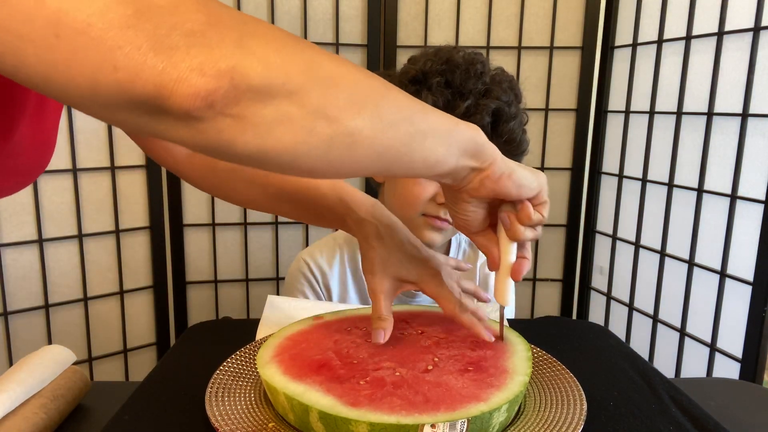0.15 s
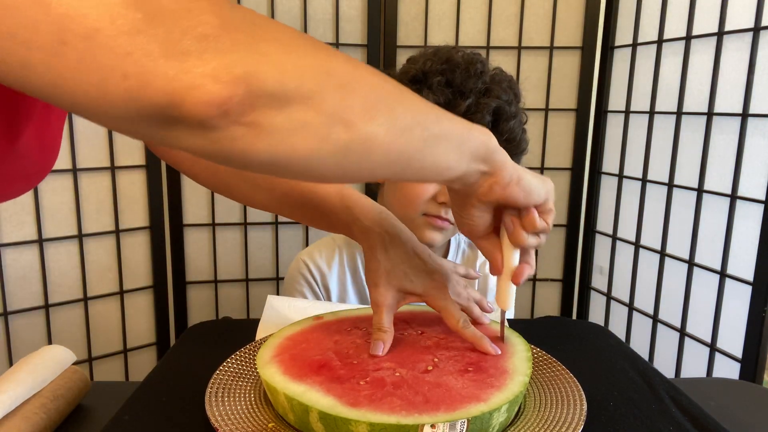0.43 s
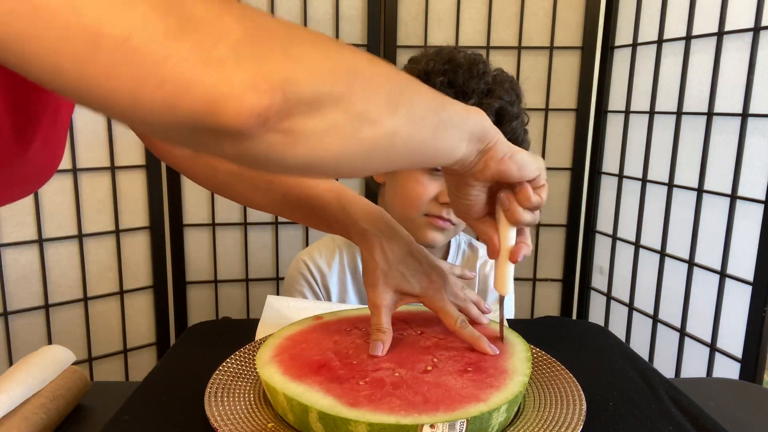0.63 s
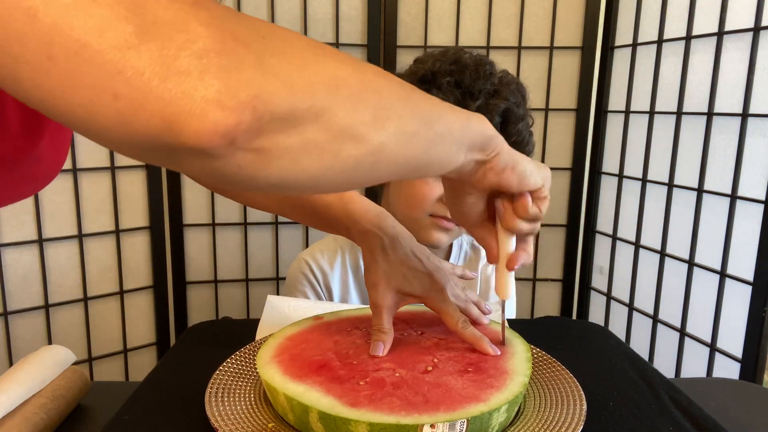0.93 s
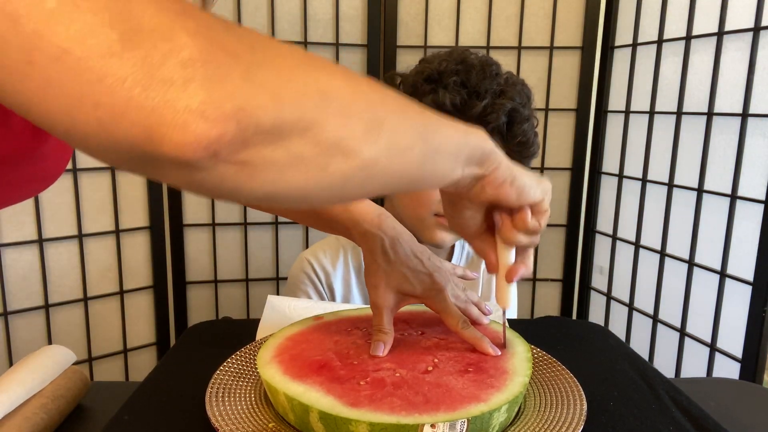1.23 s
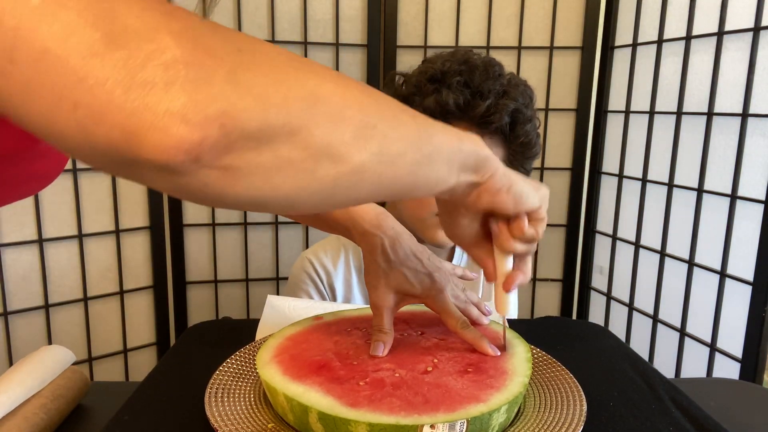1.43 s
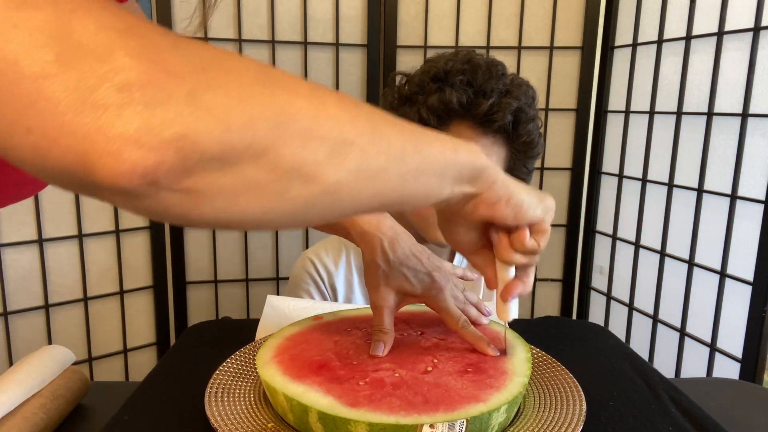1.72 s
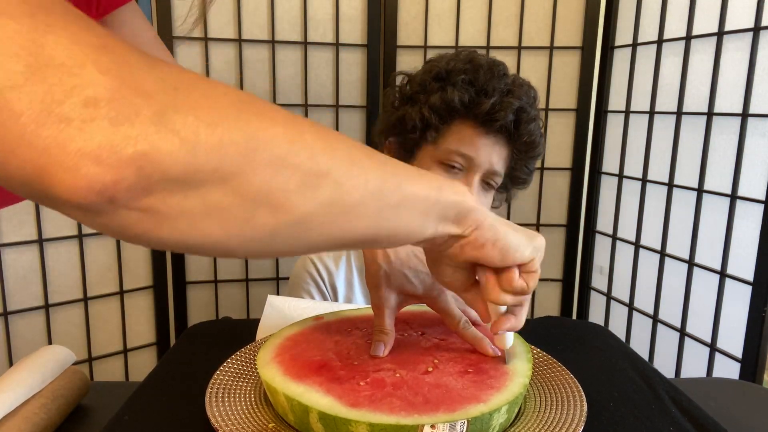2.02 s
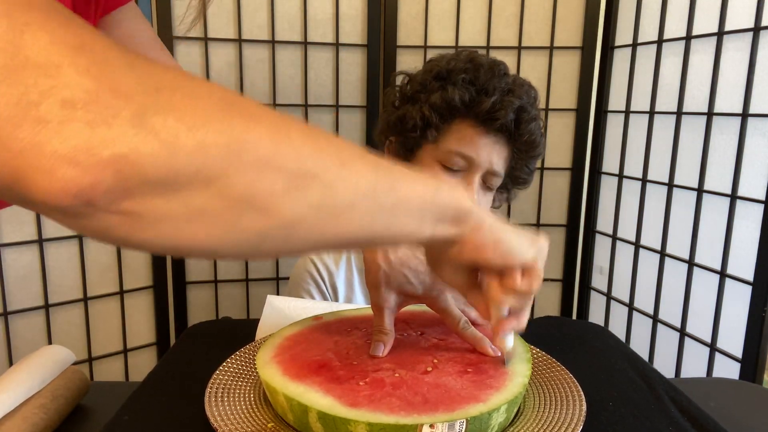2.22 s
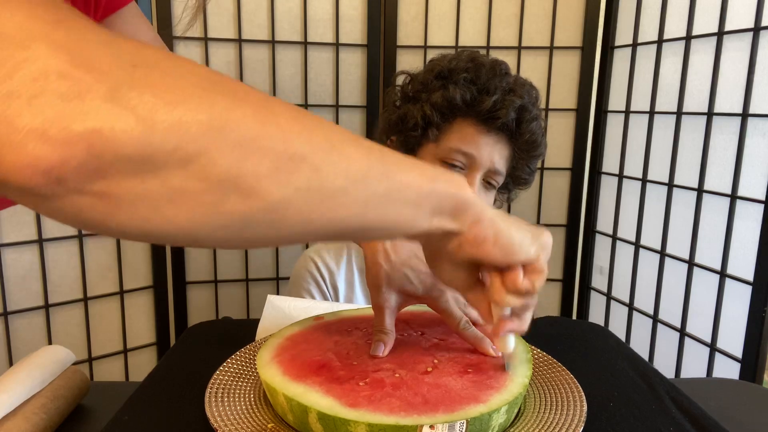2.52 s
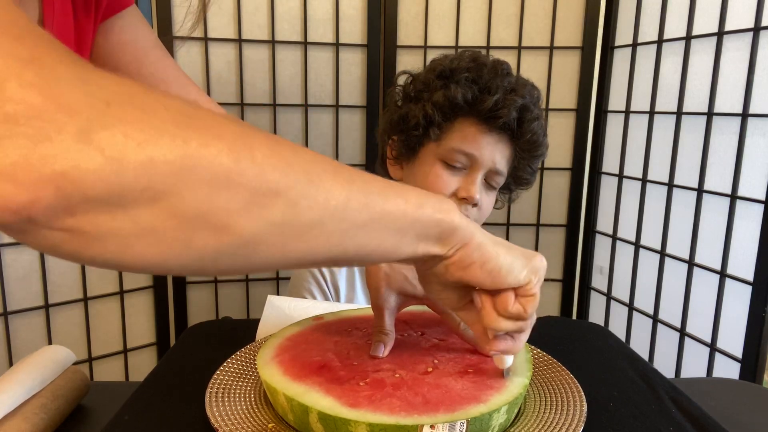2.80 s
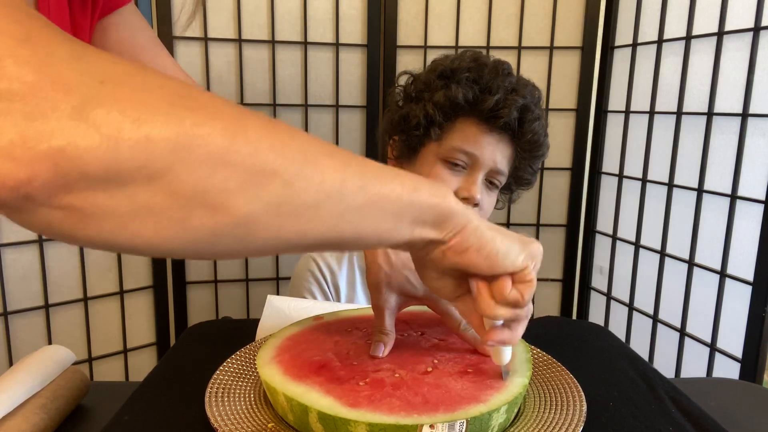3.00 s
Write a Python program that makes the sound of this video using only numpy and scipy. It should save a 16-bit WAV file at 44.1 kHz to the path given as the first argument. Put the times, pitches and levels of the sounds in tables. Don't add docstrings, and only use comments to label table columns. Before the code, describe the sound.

Short swelling crunches of a blade in watermelon flesh end in dry knocks and soft table thuds, growing quicker; close microphone on a shaky stand in a small room with faint hum and hiss.

```python
import sys
import numpy as np
from scipy import signal
from scipy.fft import rfft, irfft, next_fast_len
from scipy.io import wavfile
from scipy.ndimage import uniform_filter1d, map_coordinates

SR = 44100
rng = np.random.default_rng(int(sys.argv[2]) if len(sys.argv) > 2 else 0)


def output_pcm(signal):
    pcm = np.clip(np.atleast_2d(signal).T, -1, 1) * 32767
    wavfile.write(sys.argv[1], SR, np.round(pcm).astype(np.int16))


def convert_level_to_amplitude(level_db):
    exponent = np.asarray(level_db, float) / 20
    return 10 ** exponent


N = 138915

# (knock t/s, knock level/dB, crunch level/dB, crunch length/s, hollow slab tone level/dB)
STROKES = [(0.6661, -23, -48, 0.1, -7.5), (0.9816, -29, -43.5, 0.076, -7), (1.2369, -18, -40, 0.065, -9),
           (1.4926, -24.5, -43, 0.074, -1), (1.7386, -24.5, -40, 0.082, -3), (1.9637, -29.5, -41, 0.078, 5),
           (2.1831, -25.5, -41.5, 0.051, 1), (2.3714, -26, -42.5, 0.039, -0.5),
           (2.7441, -12, -44, 0.037, -5.5), (2.9506, -22.5, -46.5, 0.049, -2),
           (3.1313, -16, -47.5, 0.038, -4)]
# (blade level/dB, rind level/dB, crack level/dB)
GRIP = [(-13.5, -0.5, -18), (-6, -1, -17), (-6, -2.5, -19.5), (-6, 1, -20), (-3, -3, -13), (4.5, -2, -15),
        (-2.5, -3, -24), (-2, -4, -30), (-4, -5.5, -26.5), (-2, -6.5, -19.5), (-3.5, 0, -29)]
# (f/Hz, level/dB, time to fall 60 dB/s)
BLADE = [(2607, 3.5, 0.013)]


def unit(x):
    return x / np.sqrt(np.mean(x ** 2) + 1e-20)


def along(points, hz):
    f, value = np.transpose(points)
    return np.interp(np.log(hz + 1), np.log(f + 1), value)


def coloured(x, gain):
    m = next_fast_len(N + 8192)
    spectrum = rfft(x, m) * gain(np.fft.rfftfreq(m, 1 / SR))
    return unit(irfft(spectrum, m)[:N])


def wobble(rate):
    points = rng.standard_normal(int(N * rate / SR) + 4)
    return map_coordinates(points, [np.arange(N) * rate / SR])


def add(track, s, sound):
    part = track[round(s * SR):][:len(sound)]
    part += sound[:len(part)]


def ring(modes, attack_s):
    scatter_db, detune = 0.8, 0.015
    t = np.arange(SR // 8) / SR
    draw = rng.standard_normal((len(modes), 2))
    total = np.zeros(len(t))
    for k, ((hz, db, t60), (a, b)) in enumerate(zip(modes, draw)):
        decay = convert_level_to_amplitude(db + scatter_db * a - 60 * t / t60)
        tone = np.sin(2 * np.pi * hz * (1 + detune * b) * t)
        total += (-1) ** k * decay * tone
    return total * (1 - np.exp(-t / attack_s))


def crunch():
    # (f/Hz, level/dB per Hz)
    crunch_colour = [(250, -29), (500, -10), (1900, -14), (3500, -12.5), (7100, -13.5), (11000, -20.5),
                     (15500, -22), (17000, -64)]
    # (end t/s, level/dB, length/s)
    rubs = [
        (0.207, -75, .07),
        (0.442, -72.5, 0.045),
        (.47, -72, 0.023),
        (0.617, -68.5, 0.045),
        (0.892, -73, 0.044),
        (1.163, -73, 0.058),
        (2.604, -56, 0.078),
        (2.665, -68, 0.049),
    ]
    grains_per_s, grain_spread_db, clump_db = 10000, 2, 1.8
    blade_width_hz, blade_in_crunch_db = 930, -7.5
    rise_power, ease = 2.6, 0.13
    drag_from_s, drag_db = 0.69, -71
    t = np.arange(N) / SR

    happens = rng.random(N) < grains_per_s / SR
    bursts = happens * rng.standard_normal(N) * convert_level_to_amplitude(grain_spread_db * rng.exponential(size=N))
    grains = coloured(bursts * convert_level_to_amplitude(clump_db * wobble(110)), lambda hz: convert_level_to_amplitude(along(crunch_colour, hz)))
    grip_db = np.interp(t, [row[0] for row in STROKES], [row[0] for row in GRIP])
    blade = coloured(grains, lambda hz: np.exp(-((hz - BLADE[0][0]) / blade_width_hz) ** 2))
    grains = grains + convert_level_to_amplitude(blade_in_crunch_db + grip_db) * blade

    speed = np.zeros(N)
    for s, _, db, length, _ in STROKES:
        u = np.clip(1 + (t - s) / length, 0, 1)
        swell = u ** rise_power * (1 - ease * u ** 5)
        dying = convert_level_to_amplitude(-60 * np.clip(t - s, 0, 1) / 0.05)
        speed += convert_level_to_amplitude(db) * swell * dying
    rub = np.zeros(N)
    for s, db, length in rubs:
        rub += convert_level_to_amplitude(db) * np.sin(np.pi * np.clip(1 + (t - s) / length, 0, 1))
    drag = convert_level_to_amplitude(drag_db + 2.9 * wobble(14)) * (t > drag_from_s)
    return room(grains * (speed + np.abs(rub) + drag), -6)[:N]


def knocks():
    # (f/Hz, level/dB, time to fall 60 dB/s)
    plate = [(1757.2, 0.5, 0.006), (3224, -3.5, 0.0051), (4110, 0, 0.0023), (5400, 2, 0.0013),
             (7140, -12, 0.0031), (9700, 0, 0.00074), (12900, -26, 0.0023)]
    slab = [(581.5, -10.5, 0.014), (726, 2, 0.021), (964, -0.5, 0.023)]
    rind = [(1302, 4, 0.0069), (1435, -1.5, 0.021)]
    out, t = np.zeros(N), np.arange(SR // 50) / SR
    for (s, db, _, _, slab_db), (blade_db, rind_db, crack_db) in zip(STROKES, GRIP):
        parts = [(plate, 0), (BLADE, blade_db), (slab, slab_db), (rind, rind_db)]
        modes = sorted((hz, level + more, t60) for part, more in parts for hz, level, t60 in part)
        add(out, s, room(convert_level_to_amplitude(db - 1.5) * ring(modes, 0.00015), -5))
        snap = uniform_filter1d(rng.choice([-1., 1.], len(t)), size=3)
        add(out, s, convert_level_to_amplitude(db + 19.5 + crack_db - 60 * t / 0.0045) * snap)
    return out


def ticks():
    # (t/s, peak level/dB)
    cells = [
        (0.0952, -57),
        (0.16, -50),
        (0.183, -49),
        (0.1964, -49),
        (0.4125, -50),
        (0.4584, -50),
        (0.564, -47),
        (0.5798, -39.5),
    ]
    centre_hz, width_hz = 11200, 7900
    out, t = np.zeros(N), np.arange(SR // 50) / SR
    bright = coloured(rng.standard_normal(N), lambda hz: np.exp(-((hz - centre_hz) / width_hz) ** 2))
    for s, db in cells:
        add(out, s, convert_level_to_amplitude(db - 12 - 60 * t / 0.023))
    return out * bright


def thuds():
    # (t/s, peak level/dB)
    pushes = [(0.664, -43), (0.982, -47.5), (1.206, -45), (1.235, -41.5), (1.352, -47), (1.495, -39.5),
              (1.622, -46), (1.737, -38.5), (1.862, -53), (1.964, -38.5), (2.089, -56.5), (2.186, -40.5),
              (2.35, -45.5), (2.37, -42), (2.52, -53), (2.747, -38), (2.859, -59), (2.954, -47.5),
              (3.13, -57)]
    # (f/Hz, level/dB, time to fall 60 dB/s)
    table_top = [(254.4, 4.5, 0.055), (173, -4.5, 0.12), (299, 2.5, 0.029), (114, -16, 0.039),
                 (434, -18, 0.0099)]
    out = np.zeros(N)
    for s, db in pushes:
        add(out, s - 0.004, convert_level_to_amplitude(db + 9) * ring(sorted(table_top), 0.0035))
    return out


def room(sound, wet_db):
    # (f/Hz, time to fall 60 dB/s)
    ring_time = [(200, 0.9), (700, 0.36), (1500, 0.48), (2600, 0.31), (5000, 0.34), (12000, 0.32)]
    # (delay/s, level/dB)
    walls = [(.0017, -9), (.004, -9), (.0095, -9.5), (0.0121, -7.5), (0.015, -8.5), (.021, -14),
             (.028, -25.5)]
    wall_smear = np.hanning(12) / 5.5
    rise_s = 0.012
    hz, t, z = signal.stft(rng.standard_normal(SR // 2), SR, nperseg=256)
    dying = convert_level_to_amplitude(-60 * t / along(ring_time, hz)[:, None])
    tail = signal.istft(z * dying, SR, nperseg=256)[1]
    tail *= 1 - np.exp(-(np.arange(len(tail)) / SR / rise_s) ** 2)
    answer = convert_level_to_amplitude(wet_db) * tail / np.linalg.norm(tail)
    answer[0] += 1
    for k, (delay, db) in enumerate(walls):
        add(answer, delay, convert_level_to_amplitude(db) * (-1) ** k * wall_smear)
    return signal.fftconvolve(sound, answer)


def stand():
    # (t/s, f/Hz, level/dB)
    shake = [(0.0, 20.1, -29), (0.25, 18.46, -31.5), (1.46, 18.6, -33), (1.6, 20.2, -24.5),
             (1.7, 22.6, -34), (1.85, 17.7, -22), (1.94, 15.2, -32), (2.05, 23.2, -22), (2.13, 21.2, -28),
             (2.18, 19.5, -24), (2.32, 19.5, -32.5), (2.62, 19.5, -26), (2.68, 19.35, -36.5),
             (2.8, 21, -17), (2.85, 21.9, -21), (2.89, 19.7, -32), (3.01, 20.3, -19.5), (3.15, 14, -34.5)]
    # (f/Hz, level/dB per Hz)
    sway_colour = [(2, 4), (6, -8.5), (10, -5), (15, -9), (25, -120)]
    # (f/Hz, level/dB per Hz)
    rumble_colour = [(15, -37), (27, 2.5), (45, -17), (100, -22), (250, -30), (500, -44), (900, -120)]
    sway_db, rumble_db = -34, -41
    rumble_follows, rumble_db_per_s = 0.53, 2
    s, hz, db = np.transpose(shake)
    t = np.arange(N) / SR
    level_db = np.interp(t, s, db)
    turns = np.cumsum(np.interp(t, s, hz)) / SR
    rock = np.sqrt(2) * convert_level_to_amplitude(level_db) * np.sin(2 * np.pi * turns - 0.8)
    sway = coloured(rng.standard_normal(N), lambda f: convert_level_to_amplitude(along(sway_colour, f)))
    rumble = coloured(rng.standard_normal(N), lambda f: convert_level_to_amplitude(along(rumble_colour, f)))
    effort_db = rumble_follows * (level_db - level_db.mean()) + rumble_db_per_s * (t - t.mean())
    return rock + convert_level_to_amplitude(sway_db) * sway + convert_level_to_amplitude(rumble_db + effort_db) * rumble


def floor():
    # (f/Hz, level/dB per Hz)
    air = [(18, -45), (30, -1), (40, -5), (48, -49), (81, -23), (208, -39), (244, -28), (309, -37.5),
           (700, -46), (910, -84), (1540, -120)]
    # (f/Hz, level/dB per Hz)
    hiss_colour = [(290, -13), (500, -21), (698, -10), (750, -13.5), (1840, -19), (1950, -22),
                   (15900, -31.5)]
    air_db, fan_db, hiss_db = -43.5, -52, -68.5
    fan_hz, fan_width_hz = 74.2, 4.8
    a, b, c = rng.standard_normal((3, N))
    hum = convert_level_to_amplitude(air_db + 0.84 * wobble(5)) * coloured(a, lambda hz: convert_level_to_amplitude(along(air, hz)))
    fan = convert_level_to_amplitude(fan_db) * coloured(b, lambda hz: 1 / (1 + ((hz - fan_hz) / fan_width_hz) ** 2))
    hiss = convert_level_to_amplitude(hiss_db) * coloured(c, lambda hz: convert_level_to_amplitude(along(hiss_colour, hz)))
    return hum + fan + hiss


def scene():
    return (crunch() + knocks() + ticks() + thuds() + stand() + floor())[None]


def roll_off(x):
    return signal.sosfilt(signal.butter(12, 16510, fs=SR, output="sos"), x)


def record(dry):
    # (f/Hz, level/dB)
    mic = [(100, -1), (11000, 1), (14000, -1), (15900, -5)]
    top_hz = 15950
    m = next_fast_len(N + 8192)
    hz = np.fft.rfftfreq(m, 1 / SR)
    spectrum = rfft(dry, m) * convert_level_to_amplitude(along(mic, hz)) * (hz < top_hz)
    return roll_off(irfft(spectrum, m)[..., :N])


dry = scene()
out = record(dry)
output_pcm(out)
```